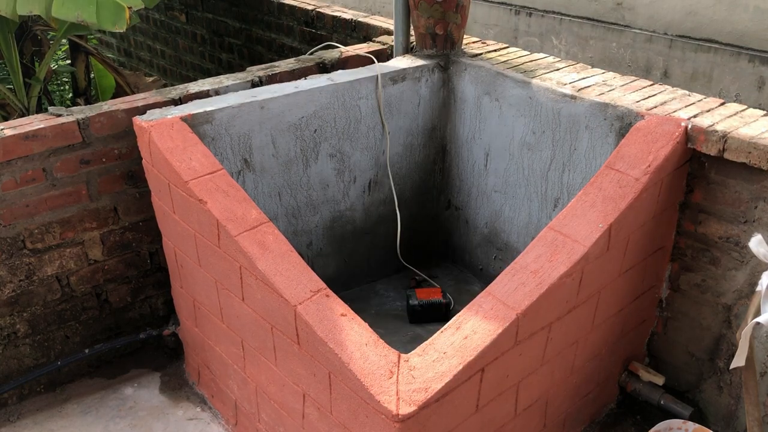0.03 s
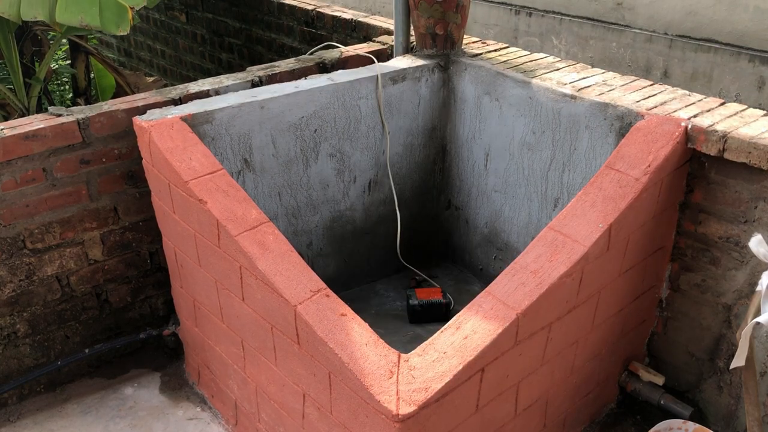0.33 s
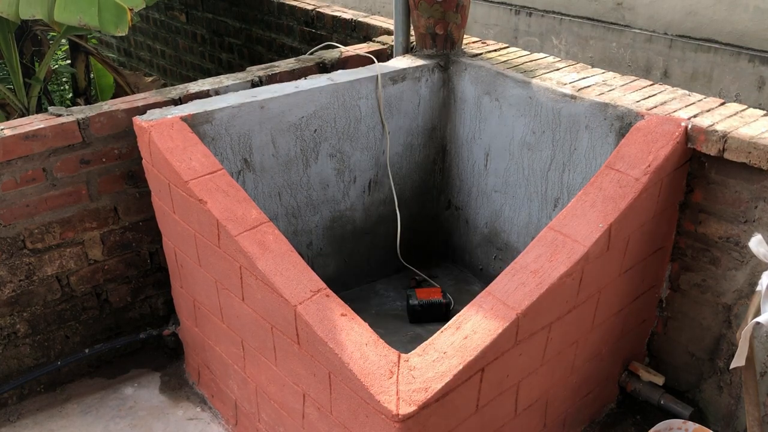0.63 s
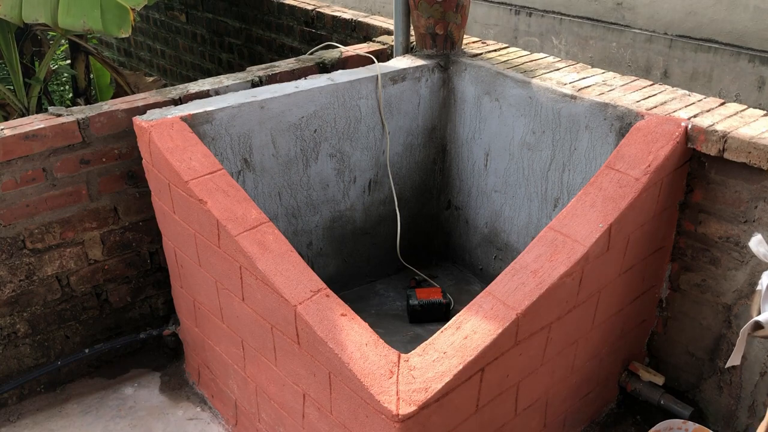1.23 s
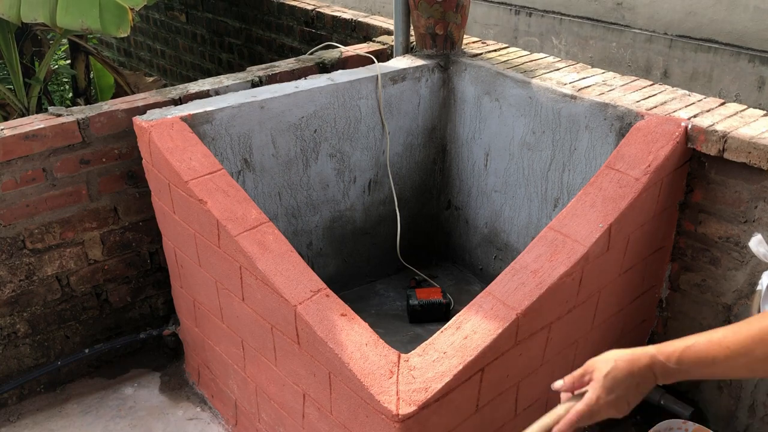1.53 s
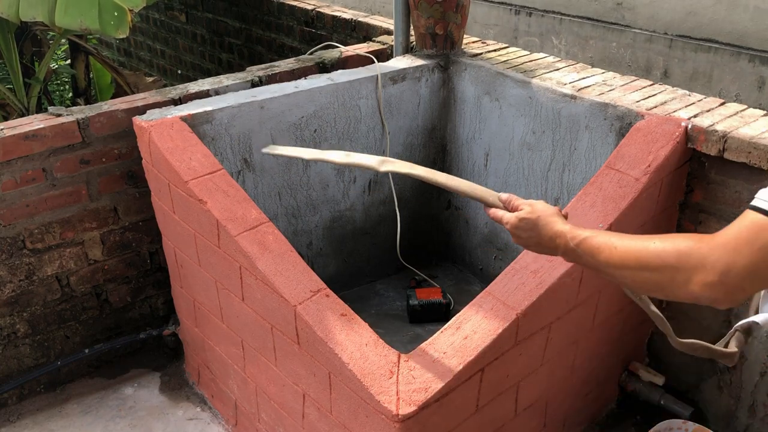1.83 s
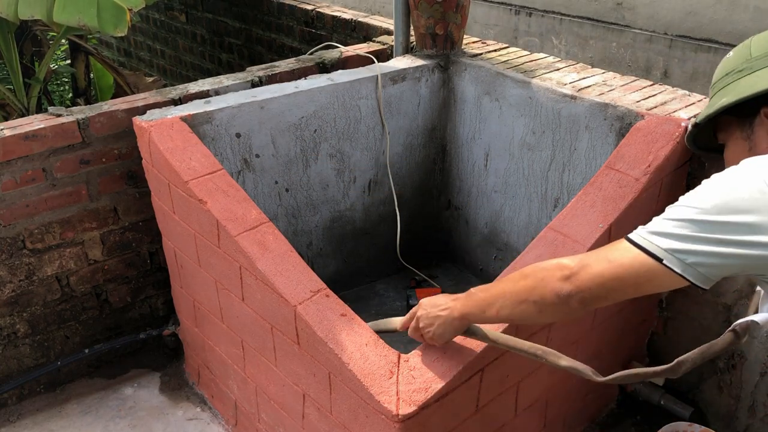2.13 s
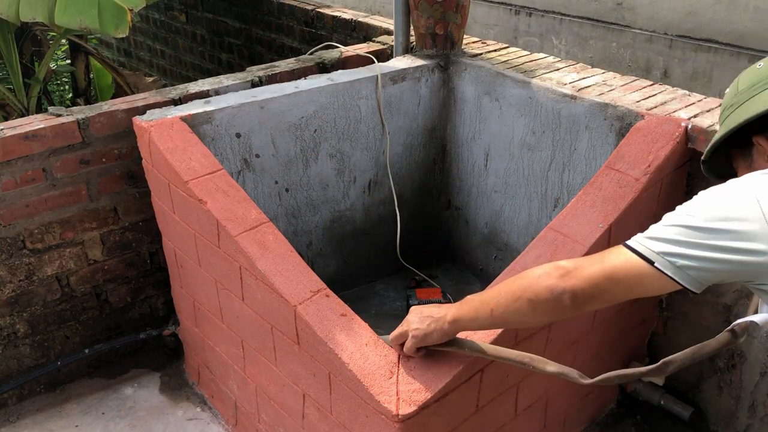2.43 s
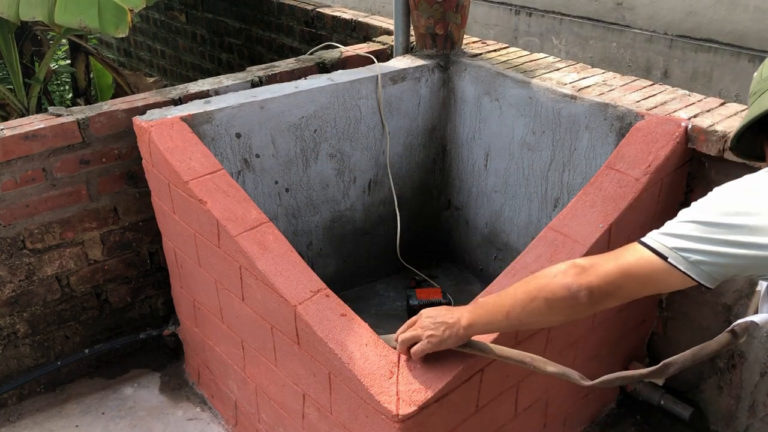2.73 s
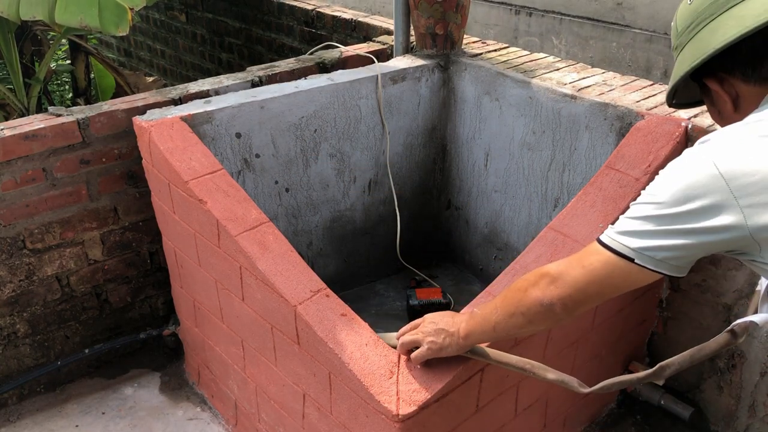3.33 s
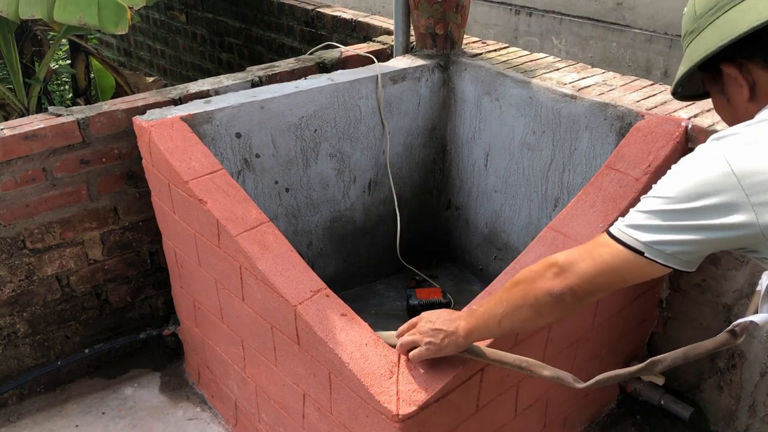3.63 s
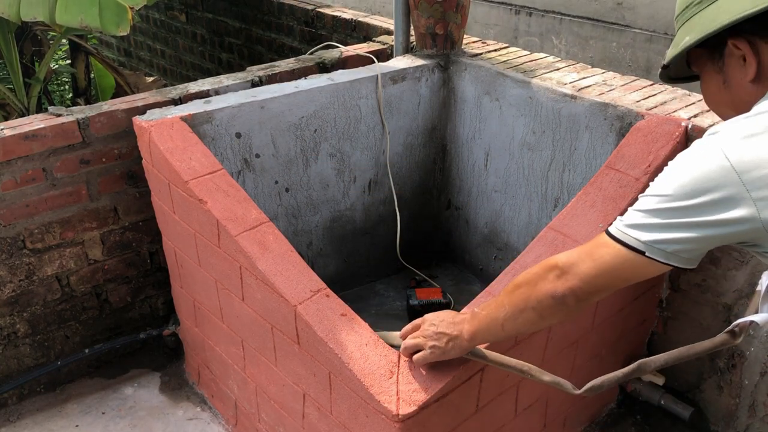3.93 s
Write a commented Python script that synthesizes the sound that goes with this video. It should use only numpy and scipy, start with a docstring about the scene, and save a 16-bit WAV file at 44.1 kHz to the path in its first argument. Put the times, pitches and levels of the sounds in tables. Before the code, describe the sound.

Shoes scuff on cement, then a hose rubs over a tank's edge with a hollow knock.

```python
"""Shoes scuff and grind on gritty cement; then a stiff hose is pushed over the rim of a cement tank.
Friction is a dense train of tiny impacts: sand scratches under the soles, and the hose slips along
the rim, catches on grit and lands with a hollow knock as its modes ring and decay.
The brick walls of the yard return quick echoes. A low outdoor rumble and a thin insect-like hiss
lie behind; the sound is mono."""
import sys
import numpy as np
from scipy import signal
from scipy.fft import rfft, irfft, next_fast_len
from scipy.io import wavfile
from scipy.ndimage import map_coordinates

SR = 44100
rng = np.random.default_rng(int(sys.argv[2]) if len(sys.argv) > 2 else 0)


def put_to_file(sound):
    """Save the sound as 16-bit audio at rate SR, in the file named by the first command-line argument."""
    columns = np.atleast_2d(sound).T  # one column per channel
    safe = np.clip(columns, -1, 1)
    whole_steps = np.round(safe * 32767)
    wavfile.write(sys.argv[1], SR, whole_steps.astype(np.int16))


N = 176400
T = np.arange(N) / SR

# Hose rubbing on the rim: start_s, rise_s, hold_s, release_t60_s, level_db, tilt_db_per_octave
HOSE_RUBS = [(2.203, 0.028, 0.0075, 0.041, -52, 1), (2.27, 0.0014, 0.0079, 0.1, -50, -1),
             (2.31, 0.006, 0.0043, 0.028, -54.5, 1.5), (2.356, 0.024, 0.039, .1, -62, 1.5),
             (2.484, 0.0037, 0.036, 0.18, -58, 3), (2.597, 0.0021, 0.0038, 0.12, -40, 0),
             (2.659, 0.0031, 0.0045, 0.064, -40, 0.9), (2.678, 0.004, 0.0096, 0.079, -40, -0.3),
             (2.688, 0.029, 0.059, 0.34, -42, -0.5), (2.7972, 0.00081, 0.0023, 0.027, -38, -3),
             (2.814, 0.013, 0.01, 0.31, -46.5, -1), (2.835, 0.0027, 0.0025, 0.057, -37, 1.5)]
# Resonances of the hose against the rim: pitch_hz, width_hz, gain_db
RIM_MODES = [(334, 34, 5.5), (620, 25, -2), (1037, 63, 0), (1280, 28, -0.5), (1440, 77, -0.5),
             (1617, 33, 1.5), (2030, 44, -7), (2620, 49, -14), (3470, 67, -9.5)]
# Spectrum of the hose's rasp: frequency_hz, gain_db
RASP_SPECTRUM = [(120, -30), (320, 4.5), (520, -24), (800, -0.5), (1100, 2), (2400, -3.5), (4000, -11.5),
                 (8000, -17), (16000, -18.5)]
# Modes of the landing hose: pitch_hz, level_db, t60_s, delay_s
KNOCK_MODES = [(219, -23.5, 0.035, 0.00087), (592, -32, 0.0173, 0.0035), (996, -23.5, 0.026, 0.00054),
               (1538, -26, 0.023, 0), (5330, -38.5, 0.026, .009)]
# Hollow note of the hose, on landing and on settling: start_s, level_db, bend_hz
HOLLOW_NOTES = [(2.846, -29.3, 17), (3.028, -50.5, 0)]
# Hose catching on grit: start_s, hold_s, level_db, pitch_hz
HOSE_CATCHES = [(1.184, 0.018, -58.5, 1116), (1.34, 0.039, -60.5, 2490), (1.376, .01, -53, 1190),
                (1.967, 0.0062, -52, 1610), (2.500, .005, -55, 3520), (2.567, 0.0034, -48, 1590),
                (2.611, 0.0039, -44, 1273), (2.716, 0.037, -51.5, 2560), (3.092, 0.0044, -54, 984),
                (3.151, 0.0054, -65, 2320), (3.202, 0.011, -67, 3370)]
# Resonances excited by a catch: pitch_ratio, gain_db
CATCH_MODES = [(1, 4.5), (2.35, -13), (3.5, -16.5)]
# Shoe scuffs: start_s, rise_s, hold_s, release_t60_s, level_db, tilt_db_per_octave
SHOE_SCUFFS = [(0.22, 0.0043, 0.013, 0.11, -44, 1), (0.242, 0.0032, 0.012, 0.4, -54, 0.2),
               (0.332, 0.012, 0.0079, 0.05, -52.5, 4), (.618, 0.04, 0.01, 0.068, -53, -1),
               (0.679, 0.0047, 0.0027, 0.23, -53, -2), (0.771, 0.1, 0.038, 0.73, -67, 2.8),
               (0.872, 0.0047, .008, 0.14, -59.5, 5), (0.94, 0.042, 0.054, 0.52, -51, 2),
               (1.098, 0.014, 0.28, 0.47, -61, 0.3), (1.324, 0.019, 0.023, 0.21, -57, -0.5),
               (1.428, 0.011, 0.011, 0.097, -53, 0), (1.462, 0.0065, 0.081, 0.33, -53.5, 1.5),
               (1.606, 0.0077, 0.014, 0.78, -60, 7), (1.963, 0.0062, 0.04, 0.28, -55.5, 2.5),
               (2.079, 0.065, 0.22, 0.24, -67.5, 0), (2.554, 0.0036, 0.023, 0.11, -47.5, 1.2),
               (2.935, 0.0062, 0.0076, 0.16, -52.5, -0.5), (3.066, .004, 0.0054, 0.069, -60, 2.5),
               (3.70, 0.014, 0.12, .2, -52, 2), (3.73, 0.011, 0.011, 0.04, -47.5, 2),
               (3.833, 0.011, 0.043, 0.34, -46.5, 0.5), (3.893, 0.008, 0.088, .2, -47, -1.1)]
# Spectrum of grit on cement: frequency_hz, gain_db
GRIT_SPECTRUM = [(100, -25), (300, 3), (800, 0.5), (1800, 0), (5000, -1.5), (8000, -7.5), (12000, -11),
                 (16000, -14)]
# Heavy drags of a sole: start_s, rise_s, hold_s, release_t60_s, level_db, pitch_ratio
SOLE_DRAGS = [(0.635, 0.0042, 0.018, 0.028, -52.5, 1.06), (0.951, 0.0023, 0.012, 0.11, -51.5, 0.93),
              (.975, 0.0015, 0.0051, 0.12, -44.5, 0.96), (0.999, 0.012, 0.017, 0.096, -45, 1.016),
              (1.098, .001, 0.0034, 0.16, -48, 0.97), (3.936, 0.018, .05, .1, -56, 1.6)]
# Resonances of a dragged sole, before its pitch is scaled: pitch_hz, width_hz, gain_db
SOLE_MODES = [(663, 70, 5.5), (1090, 156, 0.5), (1810, 240, -8), (2850, 810, -13)]
# Grit cracking under a shoe: start_s, level_db, t60_s, tilt_db_per_octave
GRIT_CRACKS = [(1.6277, -34, 0.014, 10), (1.630, -30.5, 0.018, 4), (3.697, -34, 0.013, 1.5),
               (3.6991, -30.5, 0.025, 2)]
# Soft footfalls: start_s, level_db, pitch_hz
FOOTFALLS = [(0.036, -38.5, 62.5), (.245, -42.5, 263), (0.875, -34, 116), (1.066, -38, 89), (1.8, -37, 82),
             (3.29, -43, 129), (3.702, -43, 161)]
# Reverberation time of the yard: frequency_hz, t60_s
YARD_DECAY = [(150, 0.32), (1000, 0.49), (4000, 0.41), (14000, 0.44)]
# Spectrum of the outdoor rumble: frequency_hz, gain_db
RUMBLE_SPECTRUM = [(20, -7.5), (64, 0.5), (130, 2), (215, -4.5), (320, -9.5), (600, -17.5), (1500, -28),
                   (3600, -53), (8000, -50), (15500, -44)]
# Spectrum of the outdoor hiss: frequency_hz, gain_db
HISS_SPECTRUM = [(200, -7), (1000, 4.5), (4000, -3), (16000, -13.5)]

HOSE_SLIPS = dict(per_s=5000, spread_db=2, clump_db=1.15)


def hose_slide(wall_db=-2, rasp_db=1.5):
    """Stick-slip friction: small slips on the rim rasp and drive the resonances of the hose wall."""
    out = np.zeros(N)
    for start, rise, hold, t60, db, tilt in HOSE_RUBS:
        wall = resonated(grains(SR // 2, **HOSE_SLIPS), RIM_MODES)
        rasp = shifting_contact(coloured(grains(SR // 2, **HOSE_SLIPS), RASP_SPECTRUM, tilt))
        rub = amp(wall_db) * wall + amp(rasp_db) * rasp
        add(out, start, amp(db) * stroked(rub, rise, hold, t60))
    return out


def hose_knock(landing_s=2.839, hollow_hz=328, relax_s=0.08, attack_s=0.002, low_cut_hz=166):
    """Free vibration: landing rings the hose's modes; its hollow note sags as the wall relaxes."""
    out, t = np.zeros(N), T[:SR]
    for hz, db, t60, delay in KNOCK_MODES:
        add(out, landing_s + delay, amp(db) * ring(t, hz, t60, attack_s=0.00038))
    for start, db, bend_hz in HOLLOW_NOTES:
        pitch = hollow_hz + bend_hz / (1 + (t / relax_s) ** 4)
        decay = fade(t, t60_s=0.05) + fade(t, t60_s=0.34)  # drops quickly, then lingers
        add(out, start, amp(db) * np.minimum(t / attack_s, 1) * decay * glide(pitch))
    # The knock is kept free of low rumble below its lowest mode.
    return signal.sosfilt(signal.butter(2, low_cut_hz, "high", fs=SR, output="sos"), out)


def hose_catches(width_hz=69, grit_db=-12.5):
    """Forced resonance: a snag on grit scratches with a hint of pitch set by the point of contact."""
    out = np.zeros(N)
    for start, hold, db, hz in HOSE_CATCHES:
        slips = grains(SR // 4, **HOSE_SLIPS)
        modes = [(hz * ratio, width_hz * ratio, gain_db) for ratio, gain_db in CATCH_MODES]
        scratch = resonated(slips, modes) + amp(grit_db) * coloured(slips, GRIT_SPECTRUM)
        add(out, start, amp(db) * stroked(scratch, rise_s=0.002, hold_s=hold, t60_s=0.04))
    return out


def shoe_scuffs():
    """Granular friction: sand rolls and scratches under each stroke, its impacts merging into noise."""
    out = np.zeros(N)
    for start, rise, hold, t60, db, tilt in SHOE_SCUFFS:
        impacts = grains(SR // 2, per_s=12000, spread_db=3, clump_db=2.5)
        sand = shifting_contact(coloured(impacts, GRIT_SPECTRUM, tilt))
        add(out, start, amp(db) * stroked(sand, rise, hold, t60))
    return out


def sole_drags(sag_octaves_per_s=3.5):
    """Sliding friction: a weighted sole grinds along, and its pitch sags as it slows."""
    out, t = np.zeros(N), T[:SR // 4]
    for start, rise, hold, t60, db, ratio in SOLE_DRAGS:
        grind = resonated(grains(SR // 2, per_s=1500, spread_db=2.5, clump_db=3.5), SOLE_MODES)
        travel = np.cumsum(ratio * 2 ** (-sag_octaves_per_s * t))
        slowing = map_coordinates(grind, [travel])
        add(out, start, amp(db) * stroked(slowing, rise, hold, t60))
    return out


def grit_cracks(rise_s=0.00098):
    """Brittle fracture: single pieces of grit break under the sole, each in a burst of noise."""
    out, t = np.zeros(N), T[:SR // 10]
    for start, db, t60, tilt in GRIT_CRACKS:
        envelope = np.minimum(t / rise_s, 1) * fade(t, t60)
        burst = coloured(rng.standard_normal(len(t)), GRIT_SPECTRUM, tilt)
        add(out, start, amp(db) * envelope * burst)
    return out


def footfalls():
    """Heavy damping: each step is a dull thud that dies within a few cycles."""
    out = np.zeros(N)
    for start, db, hz in FOOTFALLS:
        add(out, start, amp(db) * ring(T[:SR // 4], hz, t60_s=0.057, attack_s=0.0018))
    return out


def yard_echoes(x, tail_db=-10.5, walls_db=-14, echo_count=8, spread_s=0.02):
    """Reflection: near brick walls return a few quick echoes and a short diffuse tail."""
    hz, t, spectra = signal.stft(rng.standard_normal(SR // 2), SR, nperseg=256)
    tail = signal.istft(spectra * fade(t, along(YARD_DECAY, hz)[:, None]), SR, nperseg=256)[1]
    response = amp(tail_db) * tail / np.linalg.norm(tail)
    arrivals = (rng.random(echo_count) * spread_s * SR).astype(int)
    response[arrivals] += amp(walls_db) * rng.choice([-1, 1], echo_count) / np.sqrt(echo_count)
    return signal.fftconvolve(x, np.pad(response, (SR // 400, 0)))[:N]  # all 2.5 ms later


def insect_band(centre_hz=9320, half_width_hz=390, sag_hz_per_s=80, waver_hz=75.6, fade_db_per_s=1.5):
    """Modulation: noise spreads a high tone into an insect-like band that wavers, sinks and fades."""
    flutter = filtered(rng.standard_normal(N), lambda hz: 1 / (1 + (hz / half_width_hz) ** 2))
    pitch = centre_hz - sag_hz_per_s * T + waver_hz * wobble(10, N)
    level_db = -79.5 - fade_db_per_s * T + 0.67 * wobble(7.6, N)
    return amp(level_db) * unit(flutter * glide(pitch))


def outdoor_air(rumble_db=-56.5, sway_db=1, hiss_db=-71):
    """Ambient noise: a distant rumble sways in level beneath a soft, steady hiss."""
    level_db = rumble_db + sway_db * wobble(8.06, N)
    rumble = amp(level_db) * coloured(rng.standard_normal(N), RUMBLE_SPECTRUM)
    hiss = amp(hiss_db) * coloured(rng.standard_normal(N), HISS_SPECTRUM)
    return rumble + hiss


def grains(size, per_s, spread_db, clump_db):
    """Shot noise: tiny random impacts of uneven strength, swelling in clumps."""
    hits = rng.random(size) < per_s / SR
    strengths = amp(spread_db * np.minimum(rng.exponential(size=size), 4.5))
    signs = rng.choice([-1, 1], size)
    return hits * strengths * signs * amp(clump_db * wobble(179.4, size))


def shifting_contact(x, depth_db=4, patch_hz=351.7, patch_s=0.0251):
    """Moving contact: short-lived resonances wander through x, strongest below the treble; rms 1."""
    hz, t, spectra = signal.stft(x, SR, nperseg=512)
    knots = rng.standard_normal((200, 200))
    grid = np.meshgrid(hz / patch_hz, t / patch_s, indexing="ij")
    patches = unit(map_coordinates(knots, grid, order=1, mode="mirror"))
    gain_db = depth_db * patches / (1 + (hz[:, None] / 6000) ** 2)
    return unit(signal.istft(spectra * amp(gain_db), SR, nperseg=512)[1][:len(x)])


def stroked(x, rise_s, hold_s, t60_s):
    """Amplitude envelope: a stroke presses in, holds and lets go, and alone sets the energy of x."""
    t = T[:len(x)]
    envelope = np.minimum(t / rise_s, 1) * fade(np.maximum(t - rise_s - hold_s, 0), t60_s)
    return unit(envelope * x) * np.sqrt(np.mean(envelope ** 2))


def resonated(x, modes):
    """Modal superposition: x drives damped resonators of alternating sign; rms 1."""
    def response(hz):
        return sum((-1) ** k * amp(db) * 1j * hz * width / (centre ** 2 - hz ** 2 + 1j * hz * width)
                   for k, (centre, width, db) in enumerate(modes))
    return unit(filtered(x, response))


def coloured(x, spectrum, tilt=0):
    """Spectral shaping: x takes a spectrum, tilted in dB per octave above 300 Hz; rms 1."""
    return unit(filtered(x, lambda hz: amp(along(spectrum, hz) + tilt * np.log2(np.maximum(hz, 300)))))


def filtered(x, response):
    """Linear filtering: the spectrum of x is multiplied by a frequency response."""
    size = next_fast_len(len(x) + 8192)
    return irfft(rfft(x, size) * response(np.fft.rfftfreq(size, 1 / SR)), size)[:len(x)]


def ring(t, hz, t60_s, attack_s):
    """Damped oscillation of one struck mode."""
    return np.sin(2 * np.pi * hz * t) * fade(t, t60_s) * (1 - np.exp(-t / attack_s))


def glide(hz):
    """A sine whose phase is the integral of its frequency."""
    return np.sin(2 * np.pi * np.cumsum(hz) / SR)


def fade(t, t60_s):
    """Exponential decay, 60 dB in t60_s."""
    return np.exp(-np.log(1000) * t / t60_s)


def wobble(knots_per_s, size):
    """Smooth fluctuation: a spline through random knots."""
    knots = rng.standard_normal(int(size * knots_per_s / SR) + 4)
    return map_coordinates(knots, [np.arange(size) * knots_per_s / SR])


def along(points, hz):
    """Interpolation of (frequency_hz, value) points on a logarithmic frequency axis."""
    frequencies, values = np.transpose(points)
    return np.interp(np.log(hz + 1), np.log(frequencies + 1), values)


def amp(db):
    """Decibels to amplitude ratio."""
    return 10 ** (np.asarray(db) / 20)


def unit(x):
    """Normalisation to rms 1."""
    return x / np.sqrt(np.mean(x ** 2) + 1e-20)


def add(out, start_s, x):
    """Superposition of x on out from start_s."""
    i = round(start_s * SR)
    out[i:i + len(x)] += x[:max(N - i, 0)]


def scene():
    """Superposition: direct sound, echoes and background sum, the same in both channels."""
    direct = shoe_scuffs() + grit_cracks() + sole_drags()
    direct += hose_slide() + hose_knock() + hose_catches() + footfalls()
    mono = direct + yard_echoes(direct) + outdoor_air() + insect_band()
    return np.array([mono, mono])


def record(dry):
    """Band limiting: an ideal low-pass filter removes the highest treble."""
    top_hz = 15850
    return np.array([filtered(x, lambda hz: hz < top_hz) for x in dry])


dry = scene()
out = record(dry)
put_to_file(out)
```